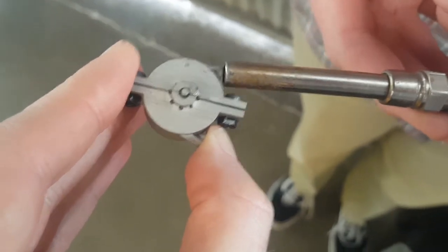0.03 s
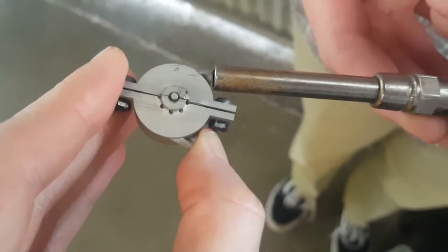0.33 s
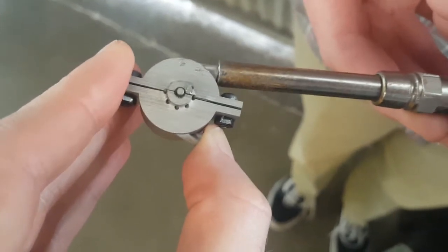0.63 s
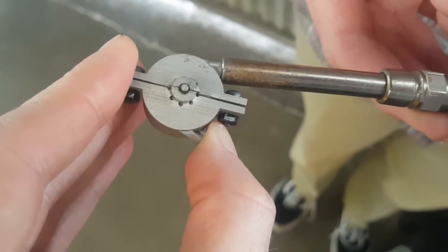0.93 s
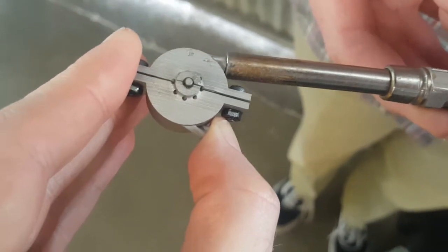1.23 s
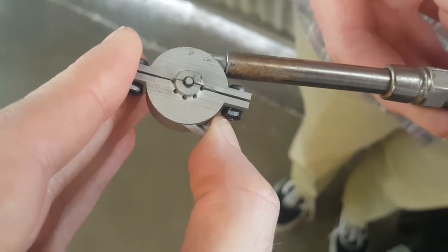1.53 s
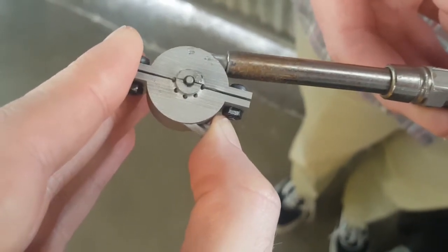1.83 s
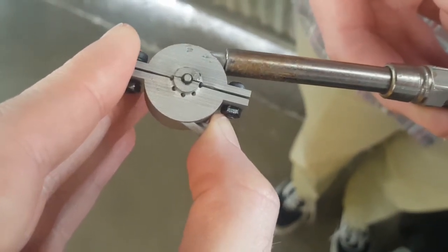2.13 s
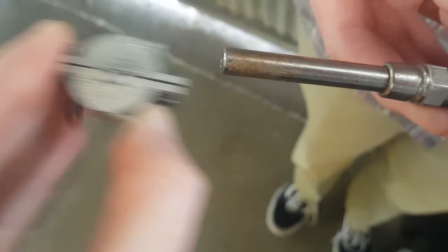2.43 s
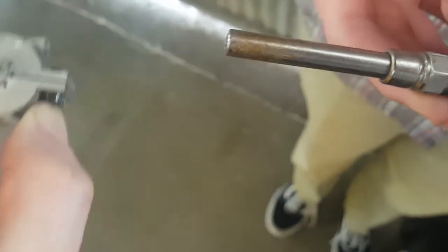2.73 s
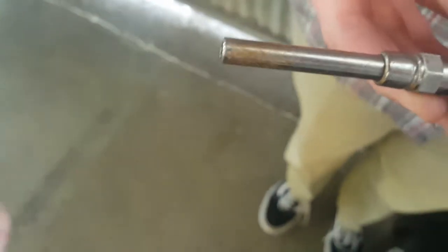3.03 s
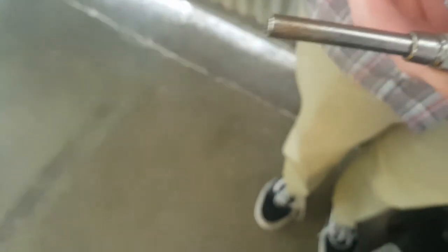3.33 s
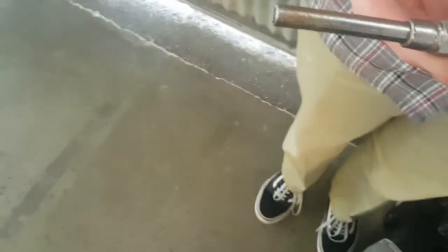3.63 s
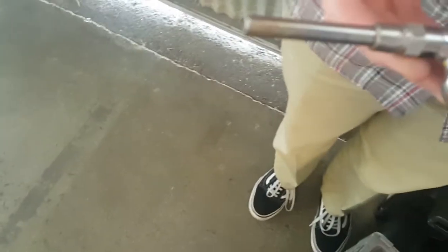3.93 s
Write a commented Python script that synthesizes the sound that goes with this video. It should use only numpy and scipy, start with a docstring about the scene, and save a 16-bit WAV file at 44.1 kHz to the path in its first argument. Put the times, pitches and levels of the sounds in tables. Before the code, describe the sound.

Compressed air roars through a small turbine, then stops, leaving a falling whine.

```python
"""A hiss of compressed air with breathy whistles opens into the roar of a small hand-held turbine.
A blow gun's jet lines up with the wheel, which chops it into tones at its turning rate. The turbine
is pulled away; the free jet grazes the housing, gusts and shuts off. The wheel coasts down with a
falling bearing whine and one metal tick, while automatic gain creeps up and lifts the workshop hum."""
import sys
import numpy as np
from scipy import signal
from scipy.fft import rfft, irfft, next_fast_len
from scipy.io import wavfile
from scipy.ndimage import uniform_filter1d, minimum_filter1d, map_coordinates

SR = 44100
rng = np.random.default_rng(int(sys.argv[2]) if len(sys.argv) > 2 else 0)


def file_out(sig):
    """Save sig as 16-bit WAV at sys.argv[1]."""
    # one column per channel
    cols = np.atleast_2d(sig).T
    # limit, then scale
    lim = np.clip(cols, -1, 1)
    pcm = np.round(lim * 32767).astype(np.int16)
    wavfile.write(sys.argv[1], SR, pcm)


N = 176400

# Tone colours of the sources. Each row: frequency in Hz, relative level in dB.
ROOM_COLOUR = [(25, -16), (62, 9.5), (110, 4.5), (200, 2), (600, -6.5), (4000, -12), (15000, -33)]
TICK_COLOUR = [(600, -18), (1700, 11), (10000, -11), (14000, 0)]
HOUSING_COLOUR = [(330, -7), (1300, -27), (2000, -11.5), (2700, -11), (3200, -3), (3600, 1.5), (4000, 1),
                  (4500, -21), (5000, -8), (5500, -5.5), (6500, -8.5), (7500, -7.5), (10000, -36),
                  (12900, -8), (15000, -24)]
WHINE_ROLLOFF = [(4200, 0), (5500, -6)]
GUST_COLOUR = [(30, -22), (110, -9.5), (230, -8), (370, -0.5), (700, -4), (1300, -12), (2200, -33),
               (6000, -45)]
HISS_COLOUR = [(30, -37), (250, -14.5), (750, -11), (1150, -1.5), (1650, -5), (2400, 0.5), (3200, -3),
               (5900, 0), (7200, -7.5), (8300, -6.5), (9800, -20.5), (12300, -8)]
ROAR_COLOUR = [(30, -28.5), (750, -21), (1180, -10.5), (1480, -16.5), (2700, -2.5), (3040, 2), (3320, -2.5),
               (3620, 2), (4020, -4.5), (4800, -3), (5050, -5), (5180, -16), (5380, -2), (6500, -8),
               (6720, -15), (7080, -1.5), (7700, -14), (8200, -9.5), (9700, -24), (12300, -39), (12800, -8),
               (15200, -11.5)]
# Stereo images. Each row: frequency in Hz, likeness of left and right from 0 (wide) to 1 (mono).
ROOM_IMAGE = [(350, 1), (900, 0.21)]
HISS_IMAGE = [(1200, 0.14), (7000, 0.05)]
ROAR_IMAGE = [(250, 0), (1200, 0.96), (1800, 0.54), (3200, 0.96), (5000, 0.27), (7000, 0.86), (9200, 0.2)]
# Fader moves of the bearing and the air layers. Each row: time in seconds, gain in dB.
WHINE_FADER = [(2.6, -28), (3.12, -27.5), (3.48, -32), (3.72, -29), (3.85, -32), (4, -35)]
WHISTLE_FADER = [(0, -24), (.17, -12.5), (.35, -20), (.5, -21.5), (.7, -53)]
HISS_FADER = [(0, -6), (.48, -6), (.58, -24.5), (2.3, -20.5), (2.39, -4), (2.52, -6), (2.7, -4),
              (2.86, -6.5), (3.075, -8), (3.105, -31.5), (3.3, -61.5)]
ROAR_FADER = [(0, -13.5), (.45, -14), (.55, -3), (.565, -3.5), (.672, -4), (.69, -4), (2.34, -3),
              (2.39, -12.5), (2.56, -60)]
# Machine hum in the room. Each row: frequency in Hz, level in dB.
HUM_TONES = [(109, -49.5), (327, -47)]
# Bearing harmonics that stand out. Each row: multiple of the wheel speed, boost in dB.
WHINE_ACCENTS = [(3, 9), (4, 9.5), (6, 2.5), (7, 2), (8, 6), (10, 3)]
# Resonances blown by the off-centre jet. Each row: centre in Hz, rough width in Hz, relative level in dB.
WHISTLE_BANDS = [(2331, 400, -0.5), (2978, 220, -3), (4070, 140, -7.5), (5607, 400, 4)]
# The jet whistling on an edge of the housing. Each row: time in seconds, centre in Hz, gain in dB.
EDGE_SWEEP = [(2.25, 5200, -63), (2.3, 5200, -16), (2.4, 5660, -13), (2.52, 4900, -15), (2.63, 4300, -5),
              (2.74, 3450, -7.5), (2.93, 4050, -16.5), (3.07, 4060, -31), (3.11, 3900, -61)]
# Gusts of the deflected jet. Each row: start in seconds, length in seconds, level in dB.
GUST_CUES = [(2.414, 0.13, -11), (2.614, .1, -15.5), (2.728, 0.327, -27)]
# Stereo phase of the roar. Each row: frequency in Hz, lead of the left side in radians.
ROAR_PHASE = [(1200, 0.23), (3000, -1.03), (3700, 0.8), (4300, 4.5), (8500, 4), (12300, -7), (15300, 10.5)]
# Tones of the chopped jet. Each row: multiple of the wheel speed, relative level in dB.
SIREN_TONES = [(1, -28), (2, -21)]
# The wheel spins up and coasts down. Each row: time in seconds, turns per second.
WHEEL_SPEED = [(0, 500), (.48, 512), (.7, 572), (.96, 624), (1.35, 640), (1.54, 634), (1.65, 603),
               (1.92, 582), (2.33, 592), (2.8, 505), (3.16, 458.2), (3.34, 436.4), (3.49, 417.6),
               (3.7, 375.1), (3.88, 342.7), (4, 323)]

JET_LEAD_S, WHEEL_LEAD_S = 0.000254, 0.00033  # earlier arrival on the left
TIME = np.arange(N) / SR


def amp(db):
    """Decibels to gain."""
    return 10 ** (np.asarray(db) / 20)


def unit(x):
    """Scale to rms 1."""
    return x / np.sqrt(np.mean(x ** 2) + 1e-20)


def along(points, hz):
    """Read (Hz, value) points on a log frequency axis."""
    f, v = np.transpose(points)
    return np.interp(np.log(hz + 1), np.log(f + 1), v)


def curve(rows):
    """Join (seconds, value) points with straight ramps."""
    return np.interp(TIME, *np.transpose(rows))


def wobble(rate):
    """A smooth random curve with `rate` knots a second."""
    return map_coordinates(rng.standard_normal(int(N * rate / SR) + 4), [TIME * rate])


def filtered(x, response):
    """A static EQ from a complex response of frequency."""
    size = next_fast_len(N + SR // 4)
    return irfft(rfft(x, size) * response(np.fft.rfftfreq(size, 1 / SR)), size)[..., :N]


def moving_eq(x, gain):
    """Apply a gain of frequency and time, then scale to rms 1."""
    hz, t, spectrum = signal.stft(x, SR, nperseg=512)
    return unit(signal.istft(spectrum * gain(hz[:, None], t), SR, nperseg=512)[1][:, :N])


def rush(colour, image, phase=lambda hz: 0 * hz):
    """Stereo noise of rms 1 with a colour (table or gain function), an image and a left phase lead."""
    gain = colour if callable(colour) else lambda hz: amp(along(colour, hz))

    def mid_side(hz):
        spread = np.arccos(np.clip(along(image, hz), 0, 1)) / 2
        return gain(hz) * [np.cos(spread), np.sin(spread)]

    mid, side = filtered(rng.standard_normal((2, N)), mid_side)
    stereo = np.array([mid + side, mid - side])
    return unit(filtered(stereo, lambda hz: np.exp(.5j * np.outer([1, -1], phase(hz)))))


def lead(seconds):
    """Phase of an earlier arrival on the left."""
    return lambda hz: 2 * np.pi * hz * seconds


def workshop(rumble_db=-42):
    """The bed: low room rumble and a nearly steady machine hum."""
    hum = sum(np.sqrt(2) * amp(db + wobble(6)) * np.sin(2 * np.pi * hz * TIME + .15 * wobble(8))
              for hz, db in HUM_TONES)
    return amp(rumble_db) * rush(ROOM_COLOUR, ROOM_IMAGE) + hum


def metal_tick(start_s=3.712, level_db=-25, t60_s=.045):
    """One light, dry tick of handled metal."""
    age = TIME - start_s
    return (age > 0) * amp(level_db - 60 * np.abs(age) / t60_s) * rush(TICK_COLOUR, [(3000, 0.19)])


def bearing_whine(speed, angle, flicker_db=2.0, rolling_db=-7, left_db=1.8):
    """Harmonics of the wheel speed slide through the housing's resonances, over rolling noise."""
    accents = {round(k): db for k, db in WHINE_ACCENTS}
    tones, power = np.zeros((2, N)), np.zeros(N)
    for k in range(3, 31):
        hz = k * speed
        # The ball cage turns slower than the wheel; the balls slip, so each tone sways at its own rate.
        cage = rng.normal(.29, .04) * angle + rng.uniform(0, 2 * np.pi)
        sway = 1 + .5 * amp(1.1 * wobble(2.3)) * np.sin(cage)
        colour_db = along(HOUSING_COLOUR, hz) + along(WHINE_ROLLOFF, hz)
        level = amp(colour_db + accents.get(k, 0) + flicker_db * wobble(16))
        phase = k * angle + rng.normal(0, 1.0) + 0.14 * wobble(64)  # nearly in step: one knock per turn
        tones += level * sway * np.sin(phase + np.outer([1, -1], np.pi * hz * WHEEL_LEAD_S))
        power += level ** 2
    rolling = rush(lambda hz: amp(along(HOUSING_COLOUR, hz) + along(WHINE_ROLLOFF, hz) / 2),
                   [(3500, 0.48)], lead(WHEEL_LEAD_S))
    rattle = amp(rolling_db) * rolling * (1 + 0.68 * np.cos(angle))
    pan = amp(left_db * np.array([[.5], [-.5]]))
    return pan * amp(curve(WHINE_FADER)) * (unit(tones / np.sqrt(power)) + rattle)


def whistles(swell_db=2.0, drift=.009, stereo_width=0.66):
    """The off-centre jet blows narrow resonances, each swelling and drifting in pitch on its own."""
    out, sides = np.zeros((2, N)), np.array([[1], [-1]])
    for hz, width, db in WHISTLE_BANDS:
        mid, side = (wobble(width) + 1j * wobble(width) for _ in range(2))
        breath = mid + stereo_width * sides * side
        pitch = hz * (1 + drift * wobble(15))
        phase = 2 * np.pi * np.cumsum(pitch) / SR + sides * np.pi * hz * JET_LEAD_S
        out += amp(db + swell_db * wobble(15)) * np.real(breath * np.exp(1j * phase))
    return amp(curve(WHISTLE_FADER)) * out


def edge_whistle(width_hz=1150):
    """The jet grazes an edge of the housing: a breathy, gliding band of noise."""
    times, centres, levels = np.transpose(EDGE_SWEEP)
    band = lambda hz, t: 1 / (1 + (2 * (hz - np.interp(t, times, centres)) / width_hz) ** 2)
    air = rush(np.ones_like, [(5000, 0.36)], lead(0.00021))
    return amp(np.interp(TIME, times, levels)) * moving_eq(air, band)


def gusts(edge_s=0.023, flutter_db=2):
    """The deflected jet sweeps across the microphone in low, fluttering puffs."""
    envelope = np.zeros(N)
    for start, length, db in GUST_CUES:
        age = TIME - start
        attack = np.clip(age / edge_s, 0, 1)
        release = np.exp(-np.maximum(age - length, 0) / edge_s)
        envelope += amp(db) * attack * release
    return envelope * amp(flutter_db * wobble(60)) * rush(GUST_COLOUR, [(400, 0.13)])


def shimmer(hz, t, depth_db=2.0):
    """Drifting patches of gain, a few hundred Hz wide, that fade out towards the bass."""
    field = uniform_filter1d(rng.standard_normal((len(hz), len(t))), 6, axis=0)
    patches = unit(uniform_filter1d(field, 24, axis=1))
    return amp(depth_db * np.minimum(hz / 2500, 1) * patches)


def jet_hiss(flutter_db=2.04):
    """Air that misses the wheel hisses in shifting colours."""
    air = moving_eq(rush(HISS_COLOUR, HISS_IMAGE, lead(JET_LEAD_S)), shimmer)
    return air * amp(curve(HISS_FADER) + flutter_db * wobble(24.96))


def driven_wheel(speed, angle, flutter_db=1.23, full_speed_hz=603, fade_db_per_hz=.07):
    """The jet roars in the housing and the turning wheel chops it into two siren tones."""
    drive_db = curve(ROAR_FADER)
    air = rush(ROAR_COLOUR, ROAR_IMAGE, lambda hz: along(ROAR_PHASE, hz))
    roar = air * amp(drive_db + flutter_db * wobble(40.16))
    shaken = angle + .2 * wobble(45)
    siren = sum(np.sqrt(2) * amp(db + wobble(24.13)) * np.sin(round(k) * shaken)
                for k, db in SIREN_TONES)
    slow_wheel_db = fade_db_per_hz * np.minimum(speed - full_speed_hz, 0)
    return roar + siren * amp(.5 * drive_db + slow_wheel_db)


def scene():
    """Mix the layers; one wheel speed, jostled by the jet, tunes both the siren and the whine."""
    speed = curve(WHEEL_SPEED) * (1 + .004 * amp(curve(ROAR_FADER)) * wobble(20))
    angle = 2 * np.pi * np.cumsum(speed) / SR
    turbine = bearing_whine(speed, angle) + driven_wheel(speed, angle)
    free_air = jet_hiss() + edge_whistle() + gusts() + whistles()
    return turbine + free_air + metal_tick() + workshop()


def gain_control(x, target_db=-9, max_boost_db=13, hold_s=0.36, recover_db_per_s=32):
    """Loud sound holds the gain down; after a pause it climbs back at a steady rate."""
    power = uniform_filter1d(np.mean(x ** 2, 0), SR // 25)
    level_db = 10 * np.log10(np.abs(power) + 1e-10)
    wanted_db = np.clip(target_db - level_db, 0, max_boost_db)
    hold = int(hold_s * SR)
    held_db = minimum_filter1d(wanted_db, hold, origin=(hold - 1) // 2, mode="nearest")
    climb_db = recover_db_per_s * TIME
    return x * amp(np.minimum.accumulate(held_db - climb_db) + climb_db)


def record(dry):
    """The output chain: automatic gain, soft clipping of the loudest peaks and a steep high cut."""
    levelled = gain_control(dry)
    clipped = levelled / (1 + np.abs(levelled) ** 8) ** (1 / 8)
    return filtered(clipped, lambda hz: hz < 15450)


dry = scene()
out = record(dry)
file_out(out)
```